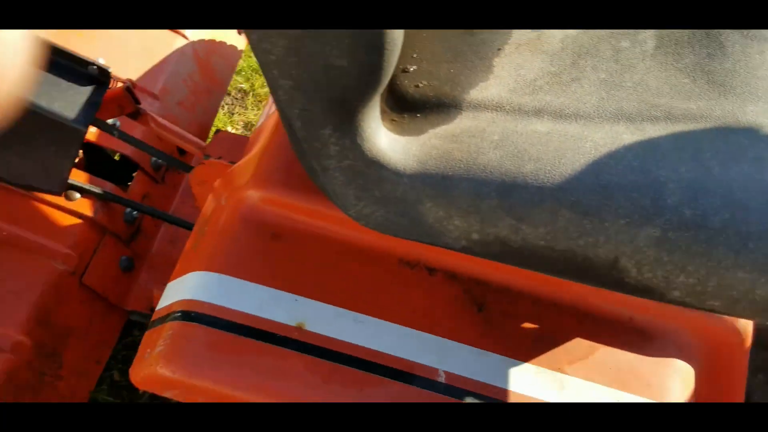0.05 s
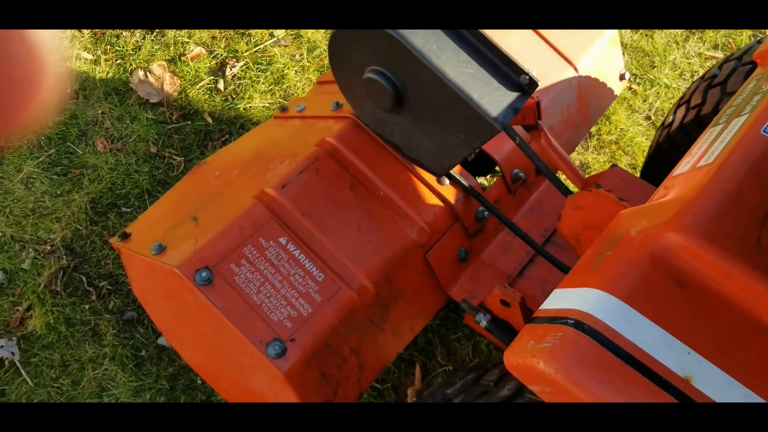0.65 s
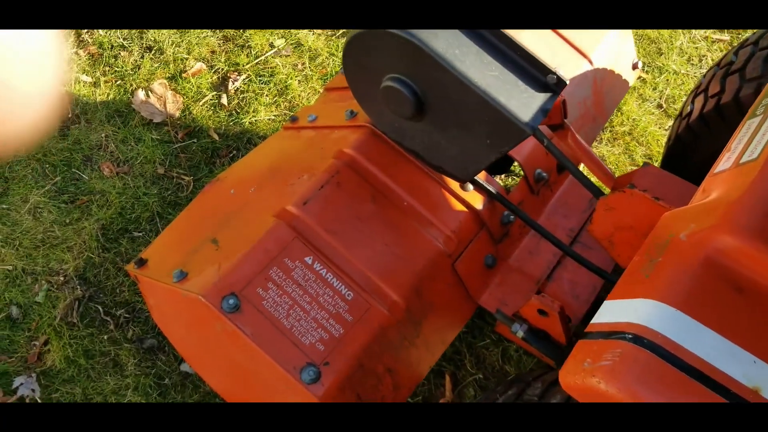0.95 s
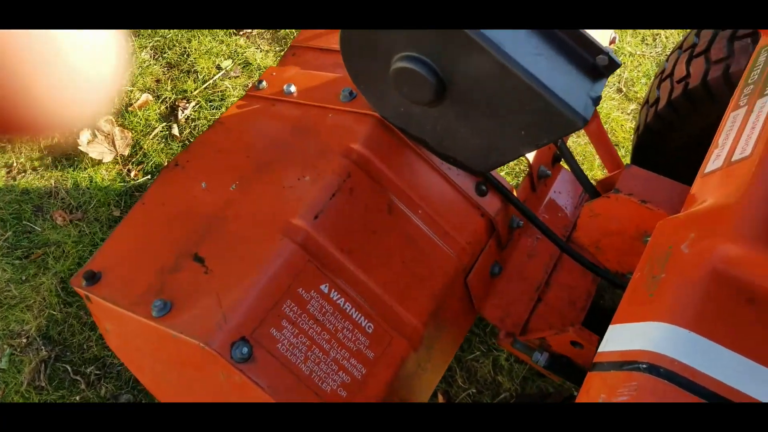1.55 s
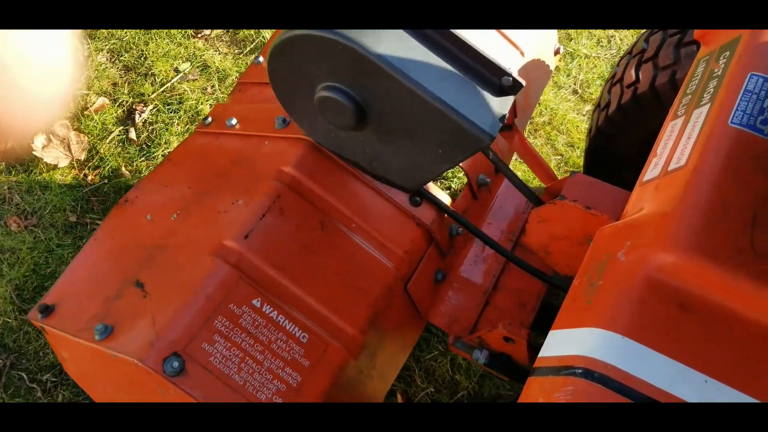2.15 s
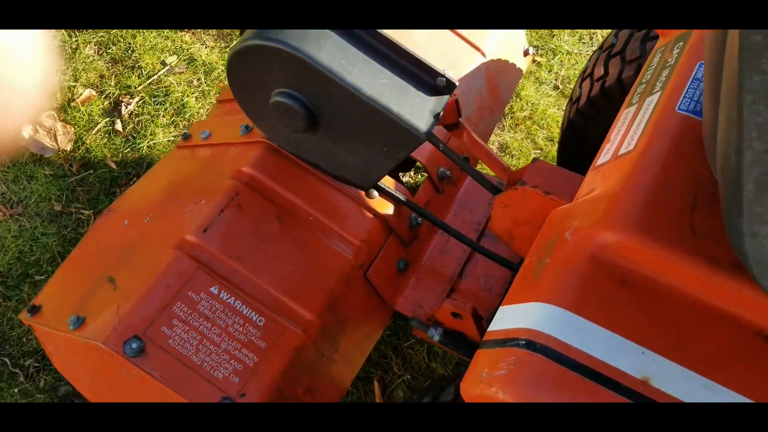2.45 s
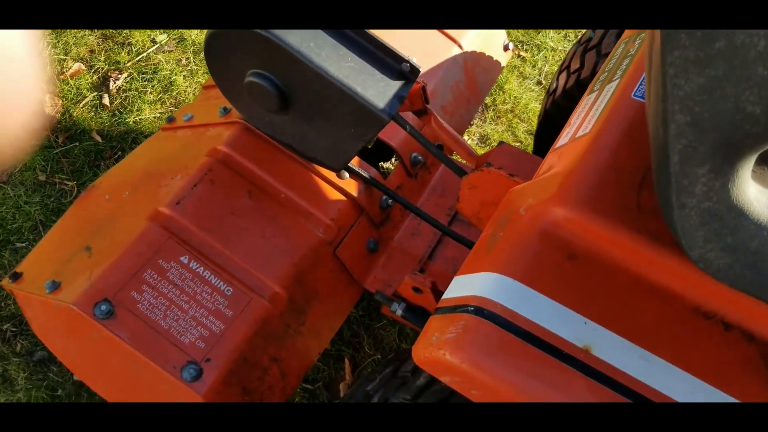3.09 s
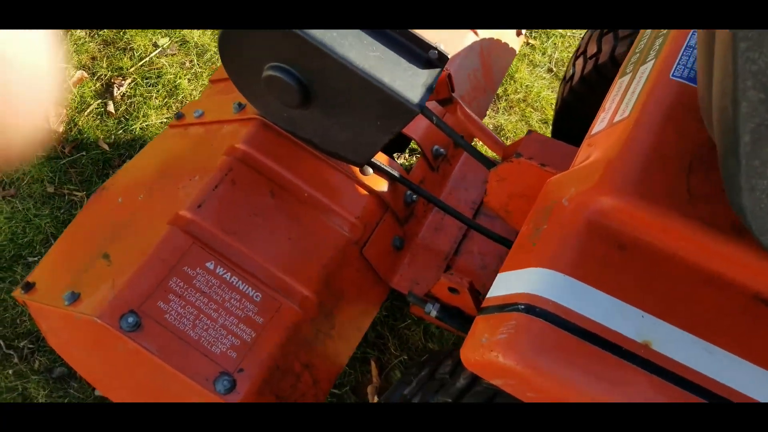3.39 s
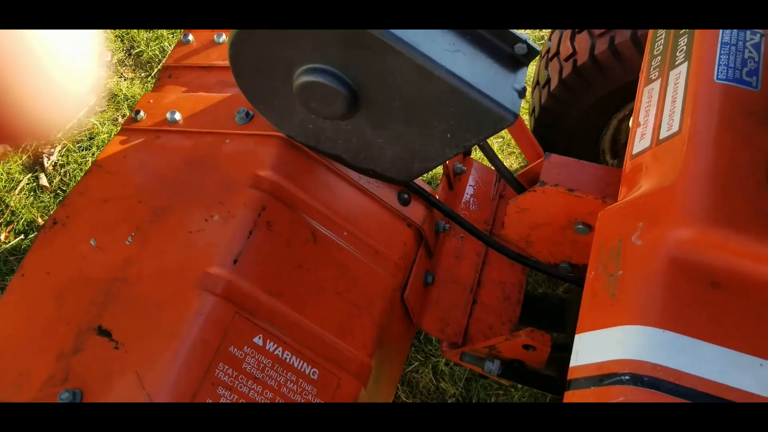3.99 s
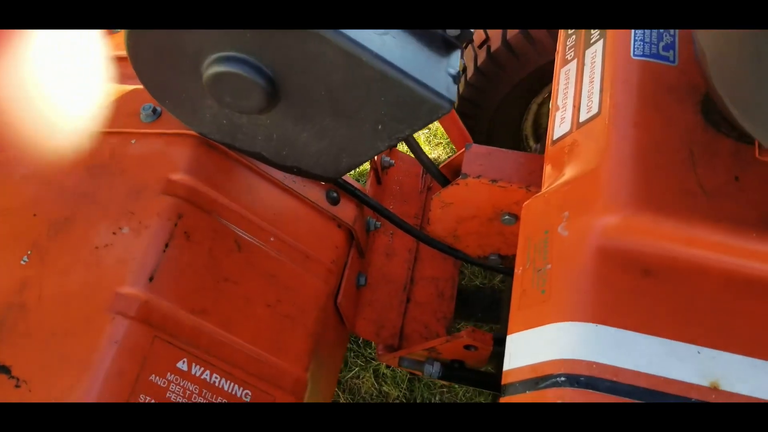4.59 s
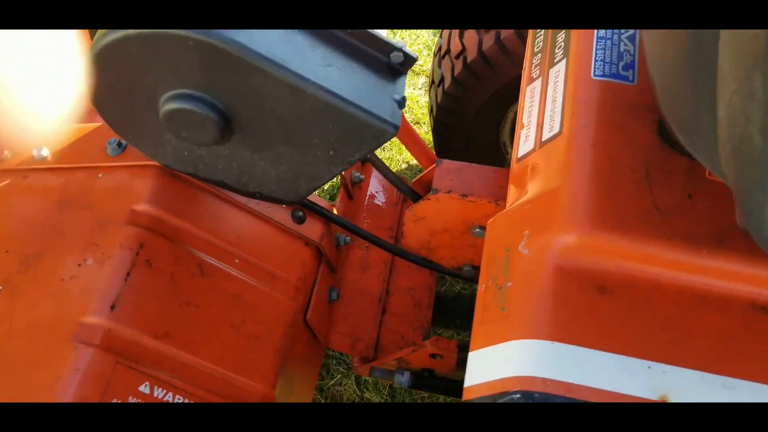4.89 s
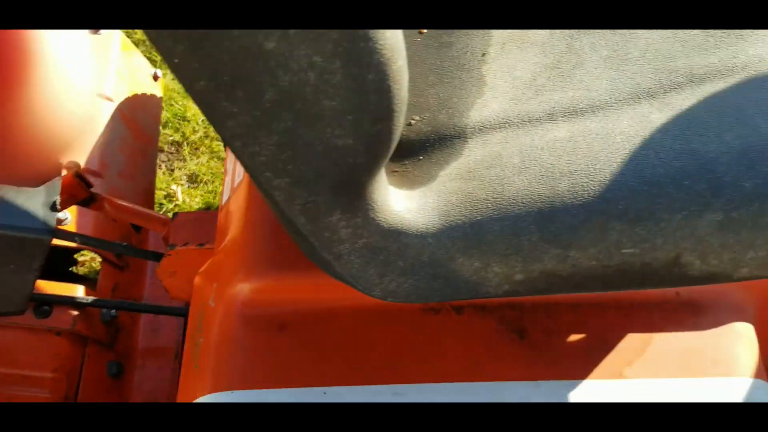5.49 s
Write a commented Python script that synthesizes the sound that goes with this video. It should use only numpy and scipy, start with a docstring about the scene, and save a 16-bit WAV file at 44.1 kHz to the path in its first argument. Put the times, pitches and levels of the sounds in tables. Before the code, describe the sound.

A steel lift lever on a garden tractor is worked, with faint scraping, clicks and three sharp clanks that ring briefly.

```python
"""A faint scrape and hiss come first, over a rumble of wind: a parked garden tractor's lift lever is
worked by hand, close by, on a lawn. Twice the sheet-steel mower deck drops with a ringing clank and is
hauled up again; the linkage slides and knocks in the frame, and the pawl snaps into its notch.
Each impact excites the damped modes of a steel part, sliding friction gives the noise between the
blows, and light air buffets the microphone."""
import sys
import numpy as np
from scipy import signal
from scipy.fft import rfft, irfft, next_fast_len
from scipy.io import wavfile
from scipy.ndimage import map_coordinates

SR = 44100
rng = np.random.default_rng(int(sys.argv[2]) if len(sys.argv) > 2 else 0)


def wav_out(sig):
    """Save sig, one row per channel (or a flat mono array), as 16-bit PCM at SR to the path in sys.argv[1]."""
    wavfile.write(sys.argv[1], SR, np.round(np.clip(np.atleast_2d(sig).T, -1, 1) * 32767).astype(np.int16))


N = 253041

# Impacts. Each row: start in seconds, level, bass, middle and treble in relative dB, rise in seconds.
DECK_DROPS = [(1.3580, -12, 1, 1, 1.5, 0.003), (3.6770, -7, -6, -4, -1.5, 0.0014)]  # the deck drops on its hangers
FRAME_KNOCKS = [(.836, -54, -8, -1, 24, 0.0012), (4.752, -28, -6, 2.5, 1, 0.00075),
                (5.040, -32.5, -5, -2, -4, 0.00047), (5.112, -39.5, 2, 3, 5, 0.0013),
                (5.2345, -18, 0, 0, 8, 0.0032), (5.425, -36, 3, -6.5, -4, 0.0058),
                (5.5015, -18.5, -1.5, -6, -9.5, 0.00059)]  # the linkage knocks in the frame
ROD_TUGS = [(4.4435, -29, 9, -0.5, 3, 0.0014)]  # the lift rod takes up its slack
PAWL_LATCHES = [(2.5645, -25, -2.5, 5, 2.5, 0.0016)]  # the pawl drops into a notch
NOTCH_SLAMS = [(5.2296, -11, -18, -5, -3, .0005), (5.2382, -15.5, 7.5, 2.5, -9, 0.00051)]  # the lever slams into its top notch and rebounds
# Pins click in their holes. Each row: start in seconds, level and treble in relative dB, rise in seconds.
PIN_CLICKS = [(.586, -54.5, 8.5, 0.0037), (1.156, -39, -5, 0.0076), (1.4645, -43, -1, 0.00069),
              (1.533, -61, 7, .0015), (2.267, -43.5, 1.5, 0.0032), (2.339, -41, -4, .002),
              (2.3785, -42.5, -2.5, 0.00054), (3.311, -48.5, 1, 0.0034), (3.403, -42, -12, 0.00087),
              (3.506, -27.5, -12, .003), (3.724, -26.5, 0.5, .0008), (3.766, -33, -6.5, 0.0071),
              (3.826, -37.5, -8, .003), (3.870, -35, 0, 0.0034), (3.885, -35, -5.5, 0.0016),
              (4.327, -60, 4, .001), (4.403, -45.5, -1.5, 0.0039), (5.1665, -31, 7.5, .0007),
              (5.211, -20, -7.5, 0.0041), (5.279, -19.5, -16, 0.0034)]
# Normal modes of each part. Each row: frequency in Hz, relative level in dB, 60 dB decay time in seconds.
DECK_MODES = [(133, -12.5, 0.96), (168.8, -5, 0.39), (194, -15.5, 0.3), (257, -18, 0.18), (304, -14, 0.16),
              (337.4, -26, 2.34), (335, -14, 0.29), (400.2, -7, 0.11), (465.6, -6.5, 0.64),
              (482, 3.5, 0.14), (516, -14, .62), (527, -11.5, 0.52), (588, -15, 0.57), (625.4, 5, 0.16),
              (723, -12, 0.41), (764, 0.5, 0.21), (822, -18.5, 0.36), (910.5, -9, 0.11), (883, -32, 1.2),
              (884, -10.5, 0.24), (1158, -19.5, 0.26), (1248, -28, 0.16), (1457, -21, .15),
              (1540, -17.5, 0.18), (1920, -27.5, 0.33), (2300, -21.5, 0.15)]
FRAME_MODES = [(164.3, -10.5, 0.42), (287.4, -14.5, 0.74), (314.5, -4.5, 0.45), (410.4, 3.5, 0.092),
               (492, -9.5, 0.38), (597, -15.5, 0.61), (648.4, -2, 0.092), (715.4, -5, 0.28),
               (794, -10.5, 0.42), (780, -32, 0.14), (888, -11, 0.32), (1025, -21, 0.48), (1080, -48, 0.24),
               (1350, -8, 0.088), (1560, -36, 0.83), (1470, -39, 0.33), (1896, -16.5, 0.21)]
ROD_MODES = [(284, 3, 0.12), (403, 5.5, 0.13), (740, -10, 0.36), (870, -13, 0.58), (1050, -20, .13),
             (1680, -15.5, 0.33), (2420, 10, 0.042), (2610, 3, 0.039), (3030, -8, .065), (4040, -22, 0.097),
             (4500, -25, .08)]
PIN_MODES = [(2880, -17, 0.045), (4680, 3, 0.045), (5800, -15, 0.066), (6300, -4.5, 0.05),
             (7900, -7.5, 0.036), (7730, 0.5, .06), (9800, -12.5, 0.056)]
PAWL_MODES = [(1370, -15, 0.16), (1300, 0, 0.06), (1460, -26.5, 0.12), (2320, -32, 0.24), (2360, -15, 0.16),
              (2560, -12.5, 0.15), (3190, -12.5, 0.076), (4440, -11, 0.043), (4600, -6, 0.035),
              (5770, -10, 0.046), (8100, -2, 0.057), (9850, 1, 0.033)]
NOTCH_MODES = [(243.5, -4, 0.13), (408.7, -2.5, 0.16), (1336, -17.5, 0.28), (4650, -5, 0.036),
               (5626, -28, .04), (6290, -6.5, 0.022), (12000, -15, 0.029), (13200, 0, 0.039)]
# Spectra of the crowded, short-lived modes. Each row: frequency in Hz, relative density in dB.
DECK_CROWD = [(60, -52.5), (130, -12), (260, -10.5), (600, 4), (900, -9), (1100, -8.5), (2100, -7),
              (2800, -16), (4000, -25.5), (9000, -24), (12500, -25.5), (16000, -48)]
FRAME_CROWD = [(60, -28.5), (200, 1), (400, -9), (800, 1), (1100, -5), (1700, -8.5), (2600, -10.5),
               (4500, -17.5), (8000, -20.5), (13000, -30), (16000, -34)]
ROD_CROWD = [(200, -20), (750, 6), (1400, -6.5), (2500, 0), (4500, -9.5), (8000, -20), (16000, -23)]
PIN_CROWD = [(100, -18.5), (400, -6), (1000, -8.5), (2300, -10.5), (3000, -1), (3900, -11.5), (4800, -3.5),
             (7200, 0.5), (8600, 3), (11500, -4.5), (14000, -7), (16500, -16.5)]
PAWL_CROWD = [(100, -7), (350, 5.5), (950, 0), (1330, 8.5), (1750, -10), (2600, 11.5), (3500, -6.5),
              (4700, 15), (7000, 7.5), (8200, 9.5), (10000, 10.5), (11500, -1.5), (14000, 11), (16500, -10)]
NOTCH_CROWD = [(300, -6.5), (1500, 0), (2400, -7), (4500, 0), (6500, 9.5), (7600, -11.5), (9300, -12.5),
               (11200, 9.5), (13000, -16), (14200, -3), (16500, -18)]
# Their damping. Each row: frequency in Hz, 60 dB decay time in seconds before a part's sustain scales it.
CROWD_DECAY = [(150, 0.74), (700, 0.43), (1500, 0.21), (3000, 0.13), (6000, 0.078), (14000, 0.073)]
# Likeness of an impact at the two ears. Each row: frequency in Hz, coherence from 0 to 1.
IMPACT_COHERENCE = [(300, 0.9), (700, 0.77), (1200, 0.11), (2500, 0.16), (5000, 0.041), (9000, 0.19),
                    (14000, 0.54)]
# The lever and deck lie to the left. Each row: frequency in Hz, left minus right level in dB.
LEFT_BIAS = [(200, 1.5), (700, 2.5), (1600, 3), (5500, 6), (9000, 1), (15000, -1)]
# Lever strokes: down, up, down, taking up slack, up, settling.
# Each row: start, tightest moment and end in seconds, hiss and scrape in relative dB.
LEVER_STROKES = [(-.06, 1.323, 1.565, -63.5, -57), (1.84, 2.242, 2.72, -62, -57),
                 (3.129, 3.623, 4.02, -63.5, -55.5), (4.254, 4.435, 4.64, -71.5, -66),
                 (4.68, 5.234, 5.45, -63.5, -52), (5.513, 5.701, 6.4, -72, -63.5)]
# Resonances that rubbing excites. Each row: centre and width in Hz, height over the scrape in dB.
LINKAGE_RESONANCES = [(1090, 110, 10), (1280, 130, 4.5), (1940, 140, 7.5), (2060, 150, 2.5),
                      (2860, 110, 2.5), (4500, 420, -7), (7960, 2200, -0.5)]
# Spectra of the noises. Each row: frequency in Hz, relative density in dB.
SCRAPE_SPECTRUM = [(500, -16), (1100, 2), (2100, 0.5), (3500, 0.5), (5000, -0.5), (8000, 0), (11000, -33),
                   (16000, -30)]
HISS_SPECTRUM = [(3000, -11), (6000, -6), (8000, -1.5), (10000, -1), (13000, 3.5), (14500, -1),
                 (16000, -6.5)]
MURMUR_SPECTRUM = [(90, -12.5), (180, -3), (360, 3.5), (650, -0.5), (1000, -13.5), (2000, -30.5),
                   (5000, -41)]
WIND_SPECTRUM = [(12, -33.5), (25, -16), (47, 0), (65, -2), (106, -3.5), (179, -17), (300, -23.5),
                 (660, -62)]
HUSH_SPECTRUM = [(150, -14), (500, -6.5), (1300, -21.5), (3300, -15.5), (6000, -12.5), (9000, -18.5),
                 (13000, -16.5), (16000, -22.5)]
# Thin sizzle of the long strokes. Each row: start and length in seconds, centre in Hz, relative dB.
SIZZLE_SPELLS = [(0.18, 0.4, 12780, -59), (1.92, 0.64, 13460, -61), (3.849, .11, 13130, -58.5),
                 (4.84, 0.58, 13400, -61)]
# Faint squeaks. Each row: start and length in seconds, first and last pitch in Hz, relative level in dB.
SQUEAK_GLIDES = [(4.833, 0.042, 5940, 7160, -54), (4.937, 0.026, 5100, 6000, -57),
                 (5.02, 0.024, 4880, 5500, -55)]
# Short, dull blips. Each row: start in seconds, centre in Hz, relative level in dB, length in seconds.
DULL_BLIPS = [(1.782, 820, -56, 0.022), (4.109, 1070, -53, 0.007)]
# Light wind, and single low bumps on the microphone. Each row: time in seconds, relative level in dB.
WIND_LEVELS = [(0.0, -54), (0.48, -50.5), (1.12, -63), (1.36, -56.5), (1.57, -51), (2.4, -60.5),
               (2.84, -60.5), (3.71, -49.5), (4.49, -48.5), (4.81, -54.5), (5.35, -47.5), (5.74, -52.5)]
WIND_BUMPS = [(.6, -34), (.86, -37), (3.263, -37), (3.318, -30.5), (4.09, -31), (5.68, -38)]


def impacts():
    """Free vibration: each struck steel part rings at its own natural frequencies."""
    deck = strikes(DECK_DROPS, DECK_MODES, DECK_CROWD, samples=SR,
                   ring_db=3, clang_db=-3, sustain=0.57, tail_db=-28)
    frame = strikes(FRAME_KNOCKS, FRAME_MODES, FRAME_CROWD, samples=SR // 2,
                    ring_db=3.5, clang_db=-3, sustain=0.6, tail_db=-26)
    rod = strikes(ROD_TUGS, ROD_MODES, ROD_CROWD, samples=SR // 4,
                  ring_db=2, clang_db=-3, sustain=0.45, tail_db=-18)
    pins = strikes(pin_blows(), PIN_MODES, PIN_CROWD, samples=SR // 4,
                   ring_db=-2, clang_db=1.5, sustain=0.7, tail_db=-24)
    pawl = strikes(PAWL_LATCHES, PAWL_MODES, PAWL_CROWD, samples=SR // 4,
                   ring_db=0, clang_db=0, sustain=0.55, tail_db=-20)
    notch = strikes(NOTCH_SLAMS, NOTCH_MODES, NOTCH_CROWD, samples=SR // 4,
                    ring_db=2, clang_db=0, sustain=0.55, tail_db=-23)
    return deck + frame + rod + pins + pawl + notch


def strikes(blows, modes, spectrum, samples, ring_db, clang_db, sustain, tail_db):
    """Impact excitation: where and how hard a blow lands sets its bass, middle and treble."""
    track = np.zeros((2, N))
    t = np.arange(samples) / SR
    peaks = ripple(depth_db=3, spacing_hz=60)
    for start, db, bass_db, middle_db, treble_db, rise in blows:
        tone = lambda hz: along([(250, bass_db), (600, 0.0014), (1300, middle_db), (4000, treble_db)], hz)
        crowd = clang(spectrum, t, lambda hz: tone(hz) + peaks(hz), sustain, tail_db)
        body = amp(ring_db) * ring(modes, t, tone) + amp(clang_db) * crowd
        onset = 1 - np.exp(-(t / rise) ** 2)  # the blow takes a moment to spread through the steel
        add(track, start, amp(db) * onset * body)
    return track


def ring(modes, t, tone, scatter_db=2):
    """Modal superposition: damped sinusoids add, the higher ones less in step at the two ears."""
    hz, db, t60 = np.transpose(modes)
    ear_draw, phase_draw, level_draw = rng.standard_normal((len(hz), 3)).T
    ear_shift = ear_draw * stereo_angle(along(IMPACT_COHERENCE, hz))
    phase = 2 * np.pi * phase_draw + np.array([ear_shift, -ear_shift])
    gain = amp(db + tone(hz) + scatter_db * level_draw) / np.linalg.norm(amp(db))
    fade = amp(-60 * t / t60[:, None])
    angle = 2 * np.pi * hz[:, None] * t
    sines, cosines = fade * np.sin(angle), fade * np.cos(angle)
    return (gain * np.cos(phase)) @ sines + (gain * np.sin(phase)) @ cosines


def clang(spectrum, t, tone, sustain, tail_db):
    """Modal overlap: crowded modes merge into noise, and damping takes the treble first."""
    crowd = noise(len(t), lambda hz: along(spectrum, hz), lambda hz: along(IMPACT_COHERENCE, hz))
    crowd = filtered(crowd, lambda hz: amp(tone(hz)))
    hz, age, bands = signal.stft(crowd, SR, nperseg=128)
    fall_db = -60 * age / (sustain * along(CROWD_DECAY, hz)[:, None])
    tail = amp(tail_db + fall_db / 3.2)  # the rest of the tractor rings on more weakly
    return signal.istft(bands * (amp(fall_db) + tail), SR, nperseg=128)[1][:, :len(t)]


def ripple(depth_db, spacing_hz):
    """Many small resonances make fixed peaks and dips above the bass: dB as a function of frequency."""
    knots = rng.standard_normal(1024)
    depth = lambda hz: depth_db * np.clip(hz / 1200, 0, 1) ** 2
    return lambda hz: depth(hz) * map_coordinates(knots, [hz / spacing_hz], mode="mirror")


def pin_blows(ticks_per_stroke=7, spread_s=0.2, over_scrape_db=9, scatter_db=4):
    """Play in the joints: the pins click, and chance ticks grow with each stroke's friction."""
    bass_db, middle_db = -4.5, 0
    tick_treble_db, tick_rise_s = -5, 0.001
    clicks = list(PIN_CLICKS)
    for _, tightest, _, _, scrape_db in LEVER_STROKES:
        for place, strength in rng.uniform(-1, 1, (ticks_per_stroke, 2)):
            lag = spread_s * place
            db = scrape_db + 20 * np.log10(binding(lag)) + over_scrape_db + scatter_db * strength
            clicks.append((tightest + lag, db, tick_treble_db, tick_rise_s))
    return [(start, db, bass_db, middle_db, treble_db, rise) for start, db, treble_db, rise in clicks]


def lever(binding_hiss_db=2):
    """Motion and friction set the strength of rubbing: the hand gathers speed, the linkage coasts."""
    motion, scrape_gain, hiss_gain = np.zeros((3, N))
    for start, tightest, end, hiss_db, scrape_db in LEVER_STROKES:
        moving = swell(start, end, attack_s=0.16, release_s=0.09)
        friction = binding(np.arange(N) / SR - tightest)
        motion += moving
        scrape_gain += moving * friction * amp(scrape_db)
        hiss_gain += moving * amp(hiss_db + binding_hiss_db * friction)
    return motion, scrape_gain, hiss_gain


def binding(lag, build_s=0.22, ease_s=0.24):
    """Friction builds exponentially to 1 at a stroke's tightest moment (lag 0), then eases."""
    return np.exp(-np.abs(lag) / np.where(lag < 0, build_s, ease_s))


def sliding(scrape_gain, hiss_gain):
    """Friction noise: rubbing drives the linkage's resonances, a gritty scrape beside a smooth hiss."""
    grit = unit(amp(2 * wobble(35) + 2.5 * wobble(150) + 2.5 * wobble(900)))
    fine_peaks = ripple(depth_db=2, spacing_hz=60)

    def scrape_colour(hz):
        resonant_power = sum(amp(db) ** 2 / (1 + (2 * (hz - centre) / width) ** 2)
                             for centre, width, db in LINKAGE_RESONANCES)
        return along(SCRAPE_SPECTRUM, hz) + 10 * np.log10(1 + resonant_power) + fine_peaks(hz)

    scrape = scrape_gain * grit * noise(N, scrape_colour, lambda hz: 0.2)
    hiss = hiss_gain * amp(0.92 * wobble(40)) * steady_noise(HISS_SPECTRUM, coherence=0.75)
    return scrape + hiss


def sizzle(sag_db_per_s=7):
    """Modulation shifts low noise into a flickering treble band; each spell starts quickly and sags."""
    t = np.arange(N) / SR
    gain = np.zeros(N)
    centres = []
    for start, length, hz, db in SIZZLE_SPELLS:
        spell = swell(start, start + length, attack_s=0.13, release_s=0.07)
        gain += spell * amp(db - sag_db_per_s * np.abs(t - start))
        centres += [(start, hz), (start + length, hz)]
    band = noise(N, lambda hz: -10 * np.log10(1 + (hz / 850) ** 3), lambda hz: 0.8)
    centre_hz = timeline(centres) + 280 * wobble(30)
    carrier = np.sqrt(2) * np.sin(2 * np.pi * np.cumsum(centre_hz) / SR)
    return gain * amp(2 * wobble(30)) * band * carrier


def squeaks():
    """Frequency modulation: thin whistles glide upward, and pitch jitter makes them scratchy."""
    track = np.zeros((2, N))
    for start, length, first_hz, last_hz, db in SQUEAK_GLIDES:
        progress = np.linspace(0, 1, int(length * SR))
        jitter = 1 + 0.035 * wobble(1500)[:len(progress)]
        glide_hz = first_hz + (last_hz - first_hz) * np.sin(np.pi / 2 * progress)
        whistle = np.sin(2 * np.pi * np.cumsum(glide_hz * jitter) / SR)
        add(track, start, amp(db) * np.sin(np.pi * progress) * whistle)
    return track


def blips():
    """Narrow-band noise under a short, smooth window is heard as a soft puff."""
    track = np.zeros((2, N))
    for start, centre_hz, db, length in DULL_BLIPS:
        samples = int(length * SR)
        puff = noise(samples, lambda hz: -40 * np.abs(np.log2((hz + 1) / centre_hz)), lambda hz: 0.8)
        add(track, start, amp(db) * np.hanning(samples) * puff)
    return track


def bodywork(motion, scrape_gain, rest_db=-73.5, moving_db=-66, over_scrape_db=2.5):
    """Forced vibration: panels murmur more as the lever moves and binds, and shudder after heavy blows."""
    shudder_db, fall_db_per_s = -28, 64.5
    t = np.arange(N) / SR
    power = amp(rest_db) ** 2 + (amp(moving_db) * motion) ** 2 + (amp(over_scrape_db) * scrape_gain) ** 2
    for start, db, *_ in DECK_DROPS + NOTCH_SLAMS:
        power += (t > start) * amp(db + shudder_db - fall_db_per_s * np.abs(t - start)) ** 2
    return np.sqrt(power) * amp(2.5 * wobble(14)) * steady_noise(MURMUR_SPECTRUM, coherence=0.8)


def wind(gain_db=6, bump_s=0.0087, bump_hz=59):
    """Pressure fluctuations: light air buffets the microphone in lumps, with a few short pushes."""
    t = np.arange(N) / SR
    lumps = unit(amp(3.3 * wobble(17)))
    rumble = amp(timeline(WIND_LEVELS) + gain_db) * lumps * steady_noise(WIND_SPECTRUM, coherence=0.35)
    for moment, db in WIND_BUMPS:
        phases = rng.normal(0, 0.8, (2, 1))
        push = np.exp(-((t - moment) / bump_s) ** 2)
        rumble += amp(db) * push * np.cos(2 * np.pi * bump_hz * (t - moment) + phases)
    return rumble * amp([[2], [-3]])  # stronger on the left


def outdoor_hush(db=-69.5):
    """Ambient noise: a faint broadband floor, partly coherent at the two ears."""
    return amp(db) * steady_noise(HUSH_SPECTRUM, coherence=0.5)


def steady_noise(spectrum, coherence):
    """Stationary stereo noise of rms 1, as long as the scene."""
    return noise(N, lambda hz: along(spectrum, hz), lambda hz: coherence)


def noise(samples, colour, coherence):
    """Mid-side noise of rms 1; colour in dB and coherence are functions of frequency."""
    def response(hz):
        angle = stereo_angle(coherence(hz))
        return [amp(colour(hz)) * share for share in (np.cos(angle), np.sin(angle))]

    mid, side = filtered(rng.standard_normal((2, samples)), response)
    return unit(np.array([mid + side, mid - side]))


def stereo_angle(coherence):
    """The mid-side mixing angle that gives this left-right coherence."""
    return np.arccos(np.clip(coherence, -1, 1)) / 2


def filtered(x, response):
    """Linear filtering: the spectrum of x times a frequency response."""
    samples = x.shape[-1]
    padded = next_fast_len(samples + 8192)
    hz = np.fft.rfftfreq(padded, 1 / SR)
    return irfft(rfft(x, padded) * response(hz), padded)[..., :samples]


def swell(start, end, attack_s, release_s):
    """An envelope that rises linearly from start and decays exponentially after end."""
    t = np.arange(N) / SR
    return np.clip((t - start) / attack_s, 0, 1) * np.exp(-np.maximum(t - end, 0) / release_s)


def wobble(rate):
    """A smooth random curve with rate knots a second."""
    knots = rng.standard_normal(int(N * rate / SR) + 4)
    return map_coordinates(knots, [np.arange(N) * rate / SR])


def along(points, hz):
    """Interpolation of (Hz, value) points on a logarithmic frequency axis."""
    frequencies, values = np.transpose(points)
    return np.interp(np.log(hz + 1), np.log(frequencies + 1), values)


def timeline(points):
    """Interpolation of (seconds, value) points at every sample."""
    return np.interp(np.arange(N) / SR, *np.transpose(points))


def add(track, start, sound):
    """Superposition of a sound on the track, from start in seconds."""
    part = track[:, round(start * SR):][:, :sound.shape[-1]]
    part += sound[..., :part.shape[1]]


def amp(db):
    """Decibels as an amplitude ratio."""
    return 10 ** (np.asarray(db) / 20)


def unit(x):
    """Normalisation to rms 1."""
    return x / np.sqrt(np.mean(x ** 2) + 1e-20)


def scene():
    """The sources add; a level difference between the ears sets the lever and deck a little left."""
    motion, scrape_gain, hiss_gain = lever()
    tractor = impacts() + sliding(scrape_gain, hiss_gain) + sizzle() + squeaks() + blips()
    placed = filtered(tractor, lambda hz: amp(np.outer([0.5, -0.5], along(LEFT_BIAS, hz))))
    return placed + bodywork(motion, scrape_gain) + wind() + outdoor_hush()


def record(dry):
    """Saturation and band limiting: peaks stop at full scale, and a steep low-pass cuts the top."""
    top_hz = 16000
    return filtered(np.clip(dry, -1, 1), lambda hz: 1 / (1 + (hz / top_hz) ** 120))


dry = scene()
out = record(dry)
wav_out(out)
```